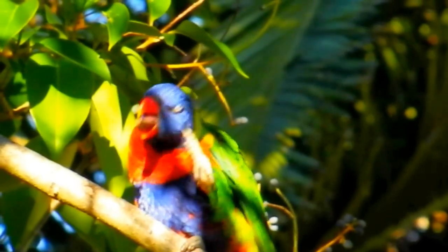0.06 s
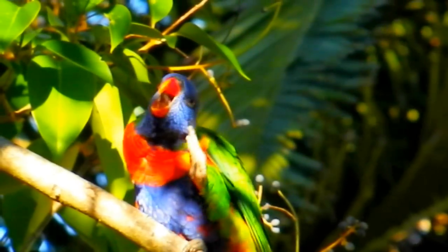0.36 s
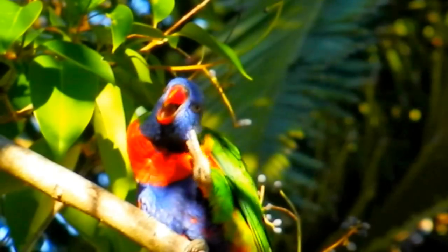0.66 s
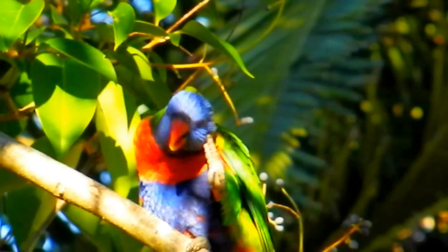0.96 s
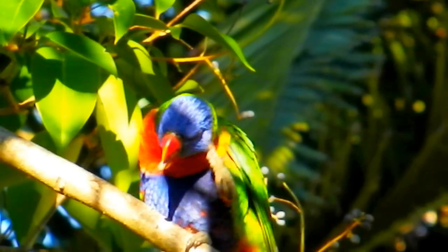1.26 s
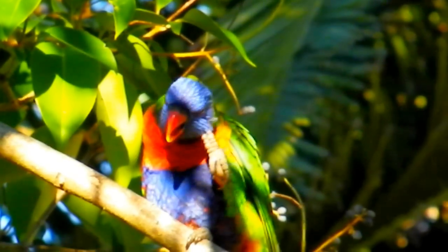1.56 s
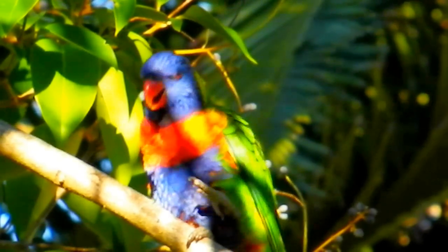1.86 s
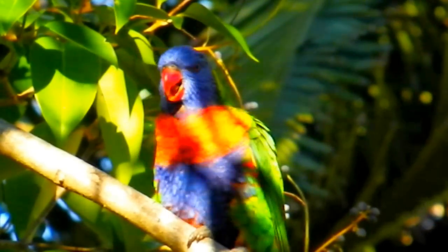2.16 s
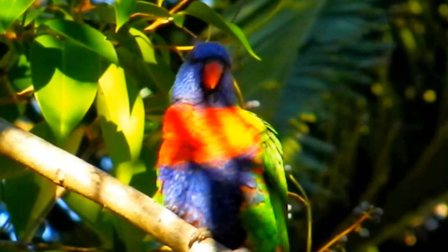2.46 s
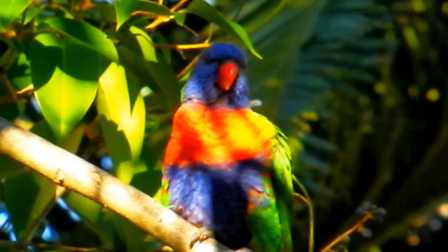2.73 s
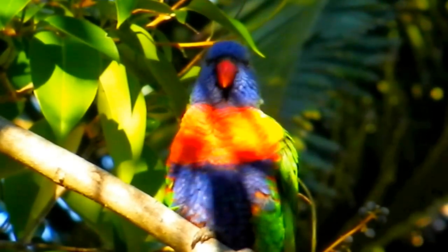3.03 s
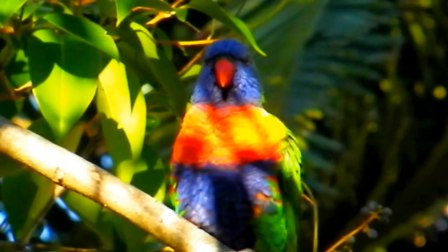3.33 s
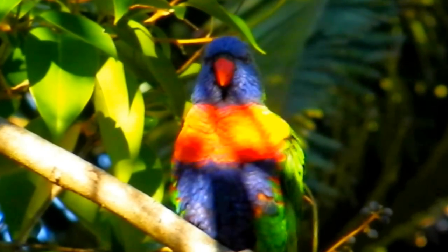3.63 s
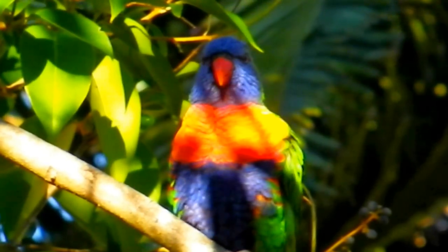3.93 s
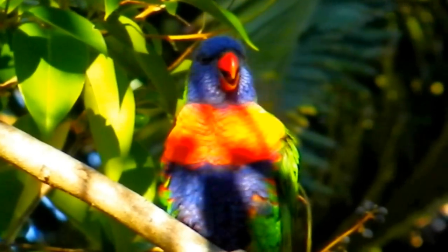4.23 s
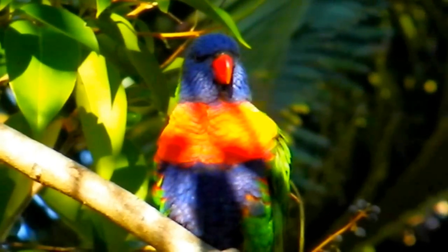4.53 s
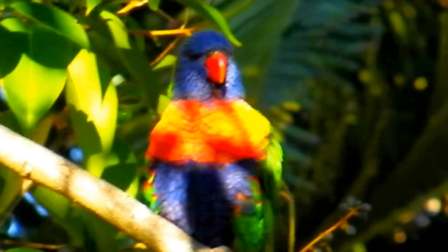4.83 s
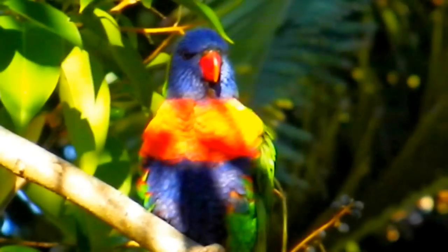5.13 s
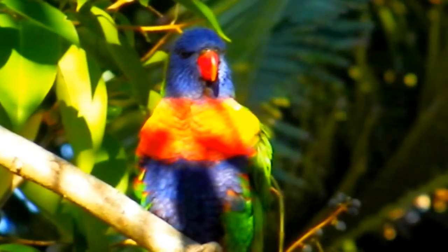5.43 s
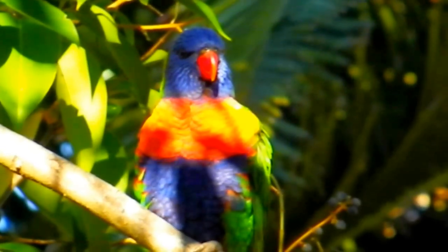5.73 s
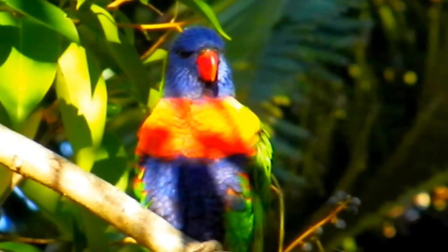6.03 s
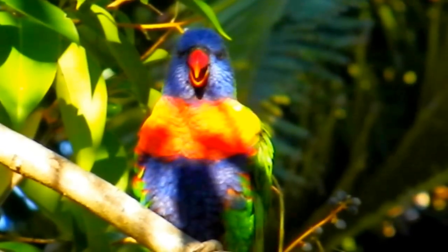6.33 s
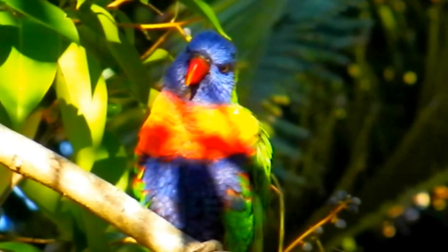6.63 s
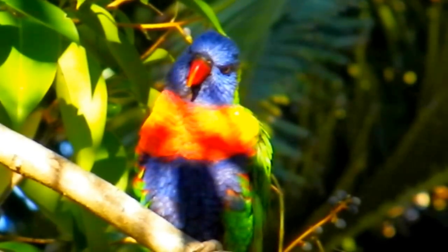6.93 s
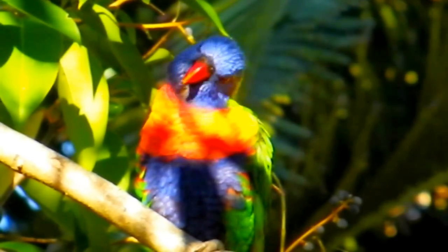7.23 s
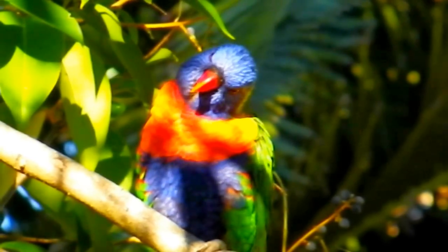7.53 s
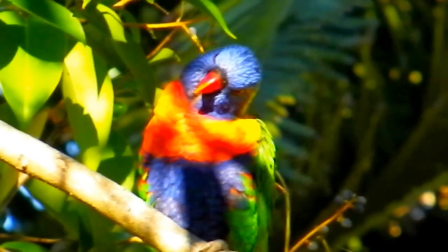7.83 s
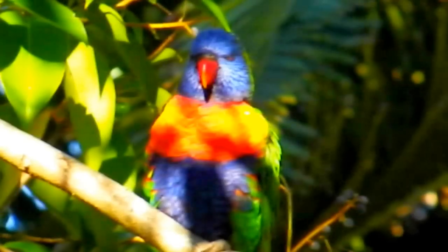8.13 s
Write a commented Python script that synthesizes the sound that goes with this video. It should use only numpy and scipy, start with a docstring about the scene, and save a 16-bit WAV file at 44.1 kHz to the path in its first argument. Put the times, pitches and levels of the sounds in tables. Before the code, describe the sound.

Short, high parrot calls, one clear whistle then two raspy screeches, come seconds apart among faint flock chirps and hiss.

```python
"""A lorikeet and its flock

A nearby lorikeet gives a rising whistle, two harsh screeches and a soft falling note. Its flock
answers from deeper in the trees, whose trunks and leaves scatter every call. In each call the bird's
voice box (the syrinx) tightens, so the pitch slides and the sound swells, and then it lets go.
Underneath lie a distant outdoor rumble and the hiss of a mono microphone."""
import sys
import numpy as np
from scipy import signal
from scipy.fft import rfft, irfft, next_fast_len
from scipy.io import wavfile
from scipy.ndimage import uniform_filter1d, minimum_filter1d, map_coordinates

SR = 44100
rng = np.random.default_rng(int(sys.argv[2]) if len(sys.argv) > 2 else 0)


def generate_wav(sig):
    """Save sig (samples, or channels by samples) to the path in sys.argv[1] as 16-bit PCM at SR."""
    pcm = np.round(np.clip(np.atleast_2d(sig).T, -1, 1) * 32767).astype(np.int16)
    wavfile.write(sys.argv[1], SR, pcm)


N = 361179

# the whistle: start t/s, length t/s, first f/Hz, held f/Hz, level/dB
WHISTLE_NOTE = (1.868, .356, 1420, 1719, -6.2)
# how much of each overtone the throat and beak let through: f/Hz, level/dB
WHISTLE_THROAT = [(1350, -6), (1750, -3.5), (3400, -0.5), (4200, -2), (4800, -6), (5150, 3.5), (5700, -6.5),
                  (6900, -7), (8500, -6), (9500, -19), (10400, -0.5), (11900, -20.5), (12600, -11.5),
                  (13700, -15.5), (15500, -35)]
def whistle():
    """A clean, swelling note. The voice skips up to a higher range, then cracks as it ends."""
    t, pitch, level_db, rough = gesture(WHISTLE_NOTE, glide_s=.128, swell_s=.19, swell_db=17.5,
                                        fade_s=.06, fade_db=13.5, bend=1.9, sag=.033,
                                        rough=.8, rough_fade=3.5)
    skip_at_s, skip_width_s, skip_share = .078, .012, .04
    upper = np.tanh((t - t[0] - skip_at_s) / skip_width_s)  # -1 before the skip, 1 after
    pitch = pitch * (1 - skip_share * (1 - upper) / 2)
    rough = rough + (1 - upper ** 2)
    shape = t, pitch, level_db, rough
    return call(shape, WHISTLE_THROAT, jitter=.0028, rasp_db=-34.5, attack_s=.009, release_s=.0068)


# start t/s, length t/s, first f/Hz, held f/Hz, level/dB, swell level/dB, swell t/s of each screech
NEAR_SCREECHES = [(4.062, 0.34, 1165, 1563, -11.7, 22, 0.1), (6.148, 0.35, 1250, 1547, -12, 16.5, 0.13)]
# throat and beak in a screech: f/Hz, level/dB
SCREECH_THROAT = [(1150, -7.5), (1600, -15.5), (2300, 1), (3100, -4), (4300, 1), (5200, -8), (6100, -7),
                  (7500, -7.5), (8300, -11), (9200, -3), (10800, -10), (11900, -17.5), (13000, -13.5),
                  (15500, -35)]
def screech(row):
    """A rising call that turns harsh because the thin skins of the voice box flutter."""
    *note, swell_db, swell_s = row
    shape = gesture(note, glide_s=.103, swell_s=swell_s, swell_db=swell_db, fade_s=.0355, fade_db=9,
                    bend=1.8, sag=.07, rough=1.05, rough_onset=1.6, rough_fade=1.6)
    return call(shape, SCREECH_THROAT, jitter=.0159, flutter=.042, flutter_hz=173.2,
                rasp_db=-13.5, dulling=.18, release_s=.015)


# the soft note: start t/s, length t/s, first f/Hz, held f/Hz, level/dB
FALLING_NOTE = (7.385, 0.1976, 2118, 1955, -25)
# throat and beak in the soft note: f/Hz, level/dB
SOFT_THROAT = [(2050, 3.5), (4100, -2.5), (6100, -1.5), (8200, 3), (10200, -8.5), (12000, -20.5),
               (14200, -11), (16000, -31.5)]
def soft_note():
    """A clean note that falls a little and dies slowly."""
    shape = gesture(FALLING_NOTE, glide_s=.075, swell_s=.034, swell_db=12,
                    fade_s=.13, fade_db=11, bend=2.1)
    return call(shape, SOFT_THROAT, jitter=.004, rasp_db=-32, attack_s=.006)


# the flock's replies: start t/s, length t/s, first f/Hz, held f/Hz, level/dB
RISING_ANSWERS = [(2.59, .33, 1348, 1550, -40), (5.865, 0.31, 1345, 1541, -38),
                  (7.77, .36, 1299, 1517, -41)]
# throat and beak in a reply: f/Hz, level/dB
ANSWER_THROAT = [(1500, -8.5), (3050, 3.5), (4600, -9.5), (6100, -12.5), (7700, -23.5), (9200, -13),
                 (10700, -24), (12500, -45)]
def answer(row):
    """A rising whistle from further off, hoarse at first."""
    shape = gesture(row, glide_s=.12, swell_s=.073, swell_db=22.5, fade_s=.0705, fade_db=9.5,
                    bend=1.61, sag=.025, rough=.75, rough_onset=2)
    return call(shape, ANSWER_THROAT, jitter=.01, flutter=.004, dulling=.17)


# the high reply: start t/s, length t/s, first f/Hz, held f/Hz, level/dB
HIGH_NOTE = (1.3, 0.28, 2250, 2590, -43.5)
# throat and beak in the high reply: f/Hz, level/dB
HIGH_THROAT = [(2500, 1), (5000, -8), (7700, -17.5), (10300, -20), (13000, -40)]
def high_answer():
    """A higher rising whistle that trembles."""
    shape = gesture(HIGH_NOTE, glide_s=.135, swell_s=.1, swell_db=11, fade_s=.079, fade_db=5.5, bend=2.8)
    return call(shape, HIGH_THROAT, count=5, jitter=.016, flutter=.008, flutter_hz=59.9)


# the flock's chirps: start t/s, length t/s, first f/Hz, last f/Hz, level/dB
FALLING_CHIRPS = [(-.088, .138, 3600, 2480, -37), (0.396, .18, 3570, 2390, -42.5),
                  (.9, .17, 3620, 2440, -41.5), (7.06, .17, 2900, 2380, -49)]
# throat and beak in a chirp: f/Hz, level/dB
CHIRP_THROAT = [(2500, 4), (3700, -12), (5000, -22), (7000, -29), (9000, -29), (10800, -26), (12500, -45)]
def chirp(row):
    """A call that starts clean and high, then drops and turns hoarse."""
    shape = gesture(row, glide_s=.095, swell_s=.068, swell_db=10, fade_s=.049, fade_db=10,
                    bend=5, rough=1.9, rough_onset=-1.6)
    return call(shape, CHIRP_THROAT, count=4, jitter=.025, flutter=.045, flutter_hz=112.6)


# parts of one twitter: start t/s, length t/s, first f/Hz, last f/Hz, level/dB, roughness
TWITTER_NOTES = [(4.74, 0.095, 1290, 1378, -41, 0.94), (4.809, .14, 3105, 3520, -40, 1.6),
                 (4.89, 0.088, 2538, 2580, -40, 0.51)]
# throat and beak in a twitter: f/Hz, level/dB
TWITTER_THROAT = [(1350, -3), (2600, 11), (3800, -2), (5000, -13), (9500, -39), (10600, -9), (11300, -1),
                  (12200, -26), (15000, -35)]
def twitter(row):
    """One short, fluttering piece of a twitter."""
    *note, rough = row
    shape = gesture(note, glide_s=.045, swell_s=.019, swell_db=4, fade_s=.052, fade_db=12, rough=rough)
    return call(shape, TWITTER_THROAT, count=4, jitter=.01424, flutter=.055, flutter_hz=131.5)


# far, thin notes: start t/s, length t/s, first f/Hz, last f/Hz, level/dB, roughness
THIN_NOTES = [(1.62, .29, 1757, 1612, -48.5, 1), (2.41, .11, 2090, 2260, -45.5, 7.3),
              (7.42, .2, 2670, 2720, -52, 6.9)]
# a throat that treats all pitches alike: f/Hz, level/dB
PLAIN_THROAT = [(1000, 0)]
def thin_note(row):
    """A piping note whose overtones are lost on the way."""
    *note, rough = row
    shape = gesture(note, glide_s=.12, swell_s=.08, swell_db=11, fade_s=.036, fade_db=6,
                    bend=1.5, rough=rough)
    return call(shape, PLAIN_THROAT, count=1, jitter=.0048)


# far screeches: start t/s, length t/s, first f/Hz, held f/Hz, level/dB before the leaves
DEEP_SCREECHES = [(.77, 0.29, 1418, 1623, -48), (6.66, .235, 1278, 1391, -36)]
def far_screech(row):
    """A screech from deep in the trees; leaves soak up its highest sounds."""
    shape = gesture(row, glide_s=.08, swell_s=.11, swell_db=4, fade_s=.045, fade_db=13)
    voice = call(shape, SCREECH_THROAT, jitter=.0295, flutter=.08, rasp_db=-33)
    return filtered(voice, lambda hz: amp(-hz / 1000 - 0.5))


# two low, far sounds: start t/s, length t/s, first f/Hz, last f/Hz, level/dB
HOOT_NOTE = (.87, .21, 598, 615, -38.5)
LONG_NOTE = (1.83, 1.1, 779, 791.5, -53.5)
def low_notes():
    """A husky hoot, and a long faint tone that is strongest at its start."""
    hoot = gesture(HOOT_NOTE, glide_s=.083, swell_s=.06, swell_db=7, fade_s=.08, fade_db=9)
    tone = gesture(LONG_NOTE, glide_s=.25, swell_s=.26, swell_db=-6.5, fade_s=.4, fade_db=1.5)
    return call(hoot, PLAIN_THROAT, count=1, jitter=.13) + call(tone, PLAIN_THROAT, count=1, jitter=.0009)


def flock():
    """All the far calls added together."""
    kinds = [(answer, RISING_ANSWERS), (chirp, FALLING_CHIRPS), (twitter, TWITTER_NOTES),
             (thin_note, THIN_NOTES), (far_screech, DEEP_SCREECHES)]
    return sum(voice(row) for voice, rows in kinds for row in rows) + high_answer() + low_notes()


# faint beak clicks: t/s, middle f/Hz, level/dB
BEAK_CLICKS = [(1.213, 2010, -45.5), (1.632, 3800, -47.5)]
def ticks():
    """Dry clicks, each a burst of noise that dies at once."""
    t = np.arange(N) / SR
    out = np.zeros(N)
    for start, hz, db in BEAK_CLICKS:
        burst = noise([(hz / 2, -25), (hz, 0), (hz * 2, -25)], N)
        out += amp(db) * (t >= start) * np.exp(-np.abs(t - start) / .0045) * burst
    return out


# the balance of rumble and hiss: f/Hz, relative level/dB
RUMBLE_AND_HISS = [(12, -34), (20, -12.5), (47, -1), (112, -2.5), (148, -3.5), (201, -8.5), (266, -3.5),
                   (314, -9), (563, -9), (613, -8.5), (765, -12.5), (2260, -24.5), (2600, -24.5),
                   (2910, -29), (15400, -36.5)]
# the tones of a faint, distant hum: f/Hz, level/dB
HUM_TONES = [(280, -56), (570, -53.5)]
def background():
    """Distant rumble, a wavering hum and the microphone's even hiss."""
    t = np.arange(N) / SR
    hum = sum(amp(db + 2 * wobble(3, N)) * np.sin(2 * np.pi * hz * t + 1.1 * wobble(13, N))
              for hz, db in HUM_TONES)
    return amp(-40 + .11 * wobble(2.16, N)) * noise(RUMBLE_AND_HISS, N) + hum


def gesture(row, glide_s, swell_s, swell_db, fade_s, fade_db,
            bend=2, sag=0, rough=1, rough_onset=0, rough_fade=0):
    """The shape of a call: it slides and swells to its held note, then droops and fades."""
    start, length, first_hz, held_hz, db = row
    t = np.arange(round(length * SR)) / SR
    slack = np.exp(-(t / glide_s) ** bend)  # a larger bend stays longer on the first pitch
    weak = np.exp(-(t / swell_s) ** bend)
    let_go = np.clip(1 - (length - t) / fade_s, 0, 1)
    collapse = let_go ** 4  # the pitch gives way only at the very end
    pitch = (held_hz + (first_hz - held_hz) * slack) * (1 - sag * collapse)
    level_db = db - swell_db * weak - fade_db * let_go
    return start + t, pitch, level_db, rough + rough_onset * slack + rough_fade * collapse


# air swirling in the throat: f/Hz, relative level/dB
BREATH_NOISE = [(600, -36), (1200, -7), (2400, -2.5), (4500, -5), (6500, 6), (8200, -21.5), (9300, -3.5),
                (11000, 6.5), (11900, -13), (13000, -8), (15500, -21)]
def call(shape, throat, count=12, jitter=0, flutter=0, flutter_hz=170,
         rasp_db=-90, dulling=0, attack_s=.0047, release_s=.016):
    """The voice box makes a tone with overtones, plus a puff of breath on every vibration."""
    t, pitch, level_db, rough = shape
    size = len(t)
    # flutter swings the pitch quickly to and fro; jitter shakes it at random
    swing = np.sin(2 * np.pi * np.cumsum(flutter_hz * (1 + .1786 * wobble(130, size))) / SR)
    hz = pitch * (1 + rough * (flutter * swing + jitter * wobble(900, size)))
    phase = 2 * np.pi * np.cumsum(hz) / SR
    k = np.arange(1, count + 1)[:, None]  # overtones are whole multiples of the pitch
    slope_db = dulling * (level_db - level_db.max()) * np.log2(k)  # less effort sounds duller
    shimmer_db = np.array([wobble(44.2, size) for _ in k])
    gains = amp(along(throat, k * hz) + slope_db + shimmer_db) * (k * hz < SR / 2)
    voiced = unit(np.sum(gains * np.sin(k * phase), axis=0) / np.linalg.norm(gains, axis=0))
    puffs = unit(noise(BREATH_NOISE, size) * (1 + .3 * np.cos(phase)))
    rasp = amp(rasp_db) * np.sqrt(np.abs(rough)) * puffs
    gate = np.clip((t - t[0]) / attack_s, 0, 1) * np.clip((t[-1] - t) / release_s, 0, 1)
    grain = amp(30 * flutter * wobble(350.4, size))  # flutter also makes the loudness uneven
    sound = amp(level_db) * gate * unit(grain * (voiced + rasp))
    return np.interp(np.arange(N), round(t[0] * SR) + np.arange(size), sound, left=0, right=0)


def scattered(x, decay, build_s):
    """A blur of echoes from trunks and leaves; each frequency dies at its own speed."""
    hz, t, spectrum = signal.stft(rng.standard_normal(SR), SR, nperseg=256)
    fade = amp(-60 * t / along(decay, hz)[:, None])
    tail = signal.istft(spectrum * fade, SR, nperseg=256)[1]
    tail *= 1 - np.exp(-np.arange(len(tail)) / SR / build_s)
    return signal.fftconvolve(x, tail / np.linalg.norm(tail))[:N]


def amp(db):
    """Turn decibels into a number to multiply by."""
    return 10 ** (np.asarray(db) / 20)


def unit(x):
    """Scale a sound to an average strength (rms) of 1."""
    return x / np.sqrt(np.mean(x ** 2) + 1e-20)


def along(points, hz):
    """Read between the rows of a (frequency, value) table, with octaves evenly spaced."""
    f, v = np.transpose(points)
    return np.interp(np.log(hz + 1), np.log(f + 1), v)


def wobble(rate, size):
    """A smooth curve through `rate` random points a second."""
    knots = np.random.default_rng(rng.integers(2 ** 31)).standard_normal(int(size * rate / SR) + 4)
    return map_coordinates(knots, [np.arange(size) * rate / SR], mode="mirror")


def filtered(x, response):
    """Turn each frequency of a sound up or down."""
    padded = next_fast_len(len(x) + 8192)
    return irfft(rfft(x, padded) * response(np.fft.rfftfreq(padded, 1 / SR)), padded)[:len(x)]


def noise(spectrum, size):
    """Noise of strength 1 with the given balance of lows and highs."""
    return unit(filtered(rng.standard_normal(N)[:size], lambda hz: amp(along(spectrum, hz))))


# how long echoes from close leaves and far trees take to drop 60 dB: f/Hz, t/s
LEAF_DECAY = [(1500, 0.37), (5000, 0.29), (12000, 0.24)]
GROVE_DECAY = [(1000, 1), (3000, 0.99), (6000, 0.76), (12000, 0.32)]
# leaves bounce high sounds back better than low ones: f/Hz, level/dB
LEAF_BOUNCE = [(1000, -11.5), (1700, -0.5), (3000, -1.5), (6000, 2.5), (12000, -2.5)]
def scene():
    """All the birds echo off close leaves; the flock gets more of the far trees' echo."""
    near = whistle() + sum(map(screech, NEAR_SCREECHES)) + soft_note()
    far = flock()
    leaves = scattered(amp(-1) * near + amp(-.5) * far, LEAF_DECAY, build_s=.0026)
    leaves = filtered(leaves, lambda hz: amp(along(LEAF_BOUNCE, hz)))
    grove = scattered(amp(-24) * near + amp(-6.5) * far, GROVE_DECAY, build_s=.018)
    mono = near + amp(-.5) * far + leaves + grove + ticks() + background()
    return np.array([mono, mono])


def record(dry):
    """The camera quickly turns down peaks that are too loud and drops the very highest sounds."""
    top_hz = 15750
    needed = 1 / np.maximum(np.abs(dry).max(axis=0), 1)
    gain = uniform_filter1d(minimum_filter1d(needed, size=89), size=67)
    return np.array([filtered(side * gain, lambda hz: hz < top_hz) for side in dry])


dry = scene()
out = record(dry)
generate_wav(out)
```